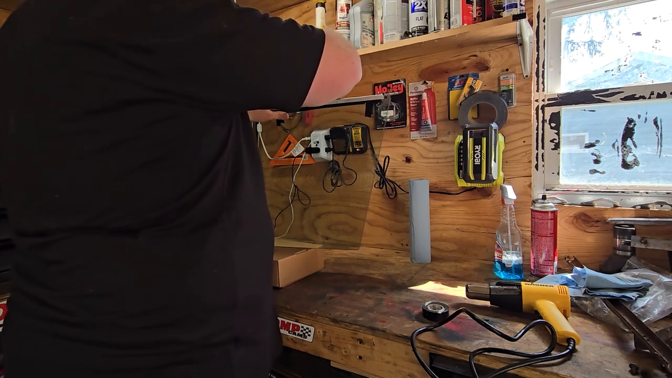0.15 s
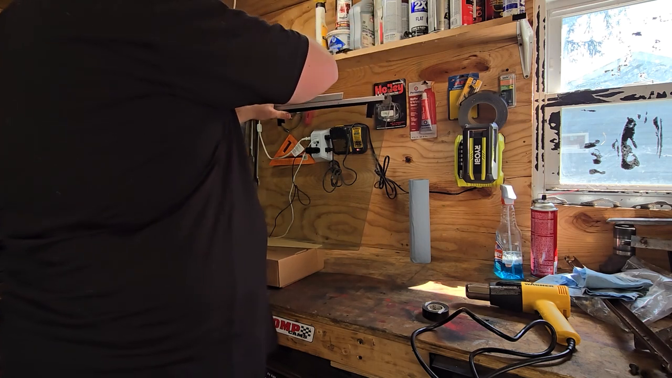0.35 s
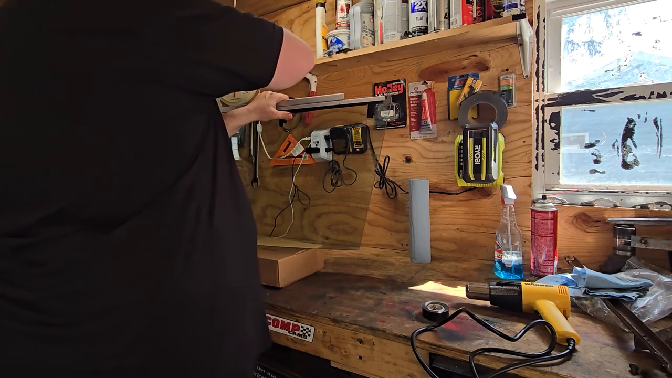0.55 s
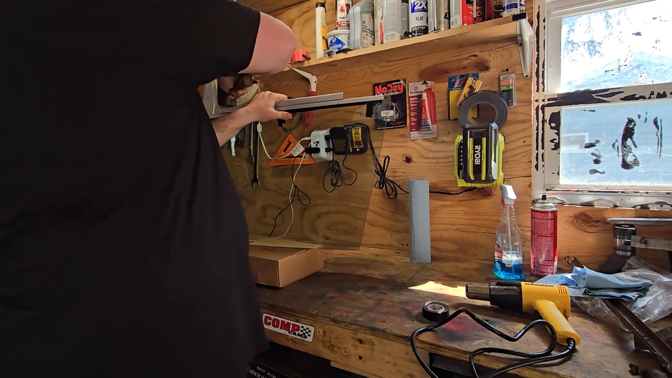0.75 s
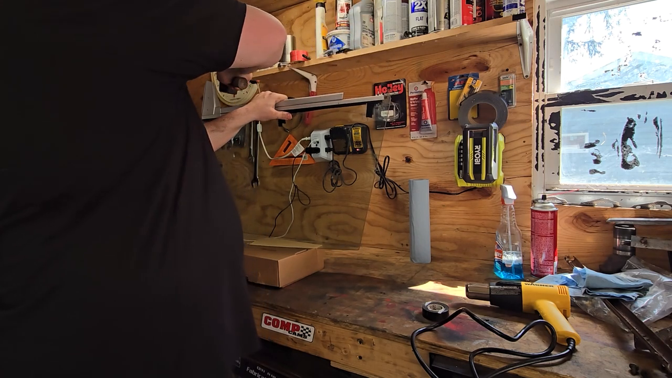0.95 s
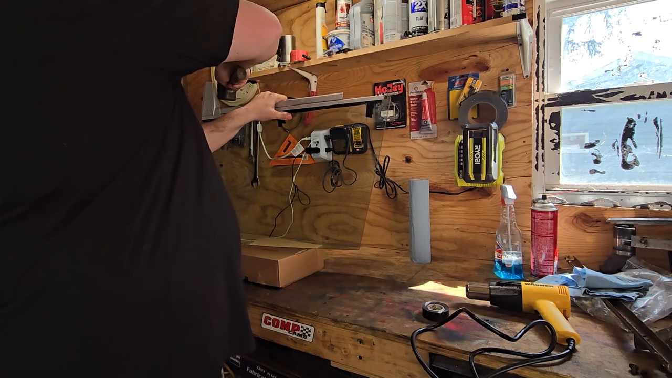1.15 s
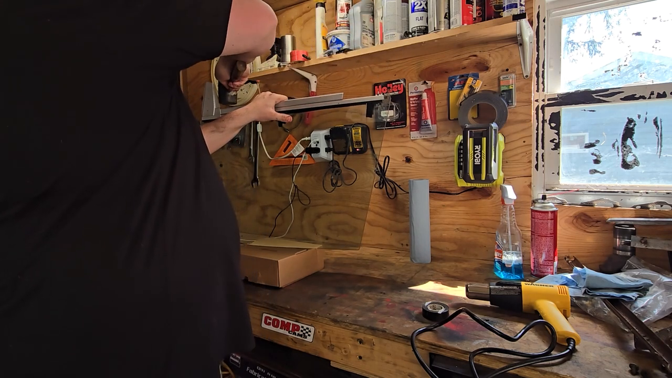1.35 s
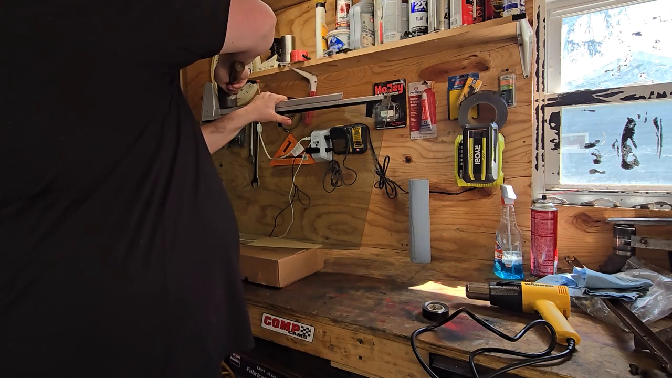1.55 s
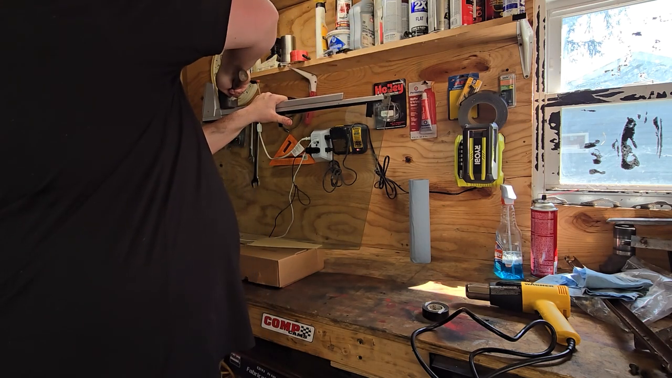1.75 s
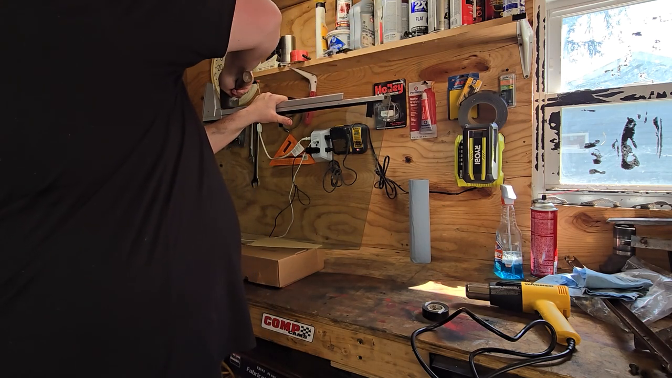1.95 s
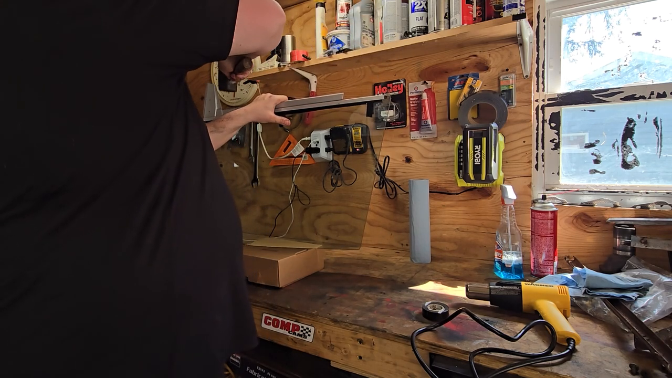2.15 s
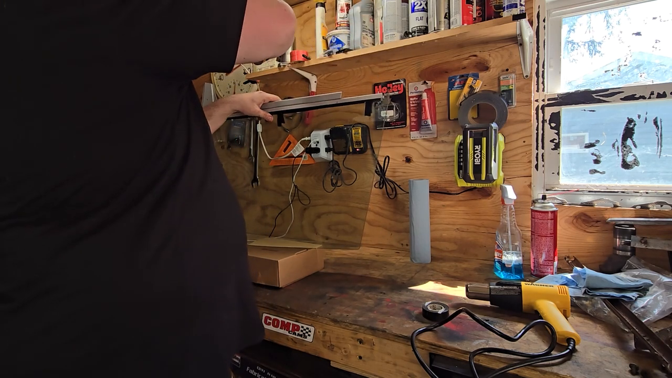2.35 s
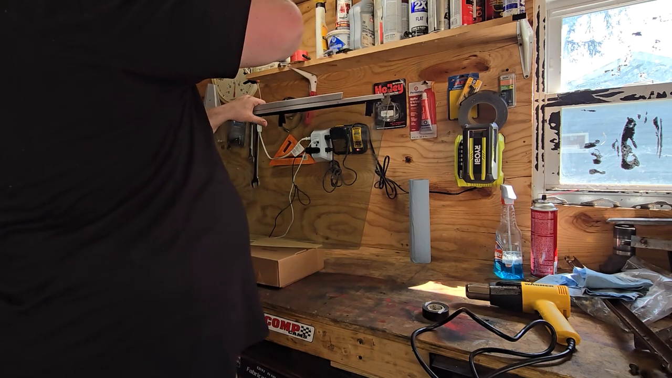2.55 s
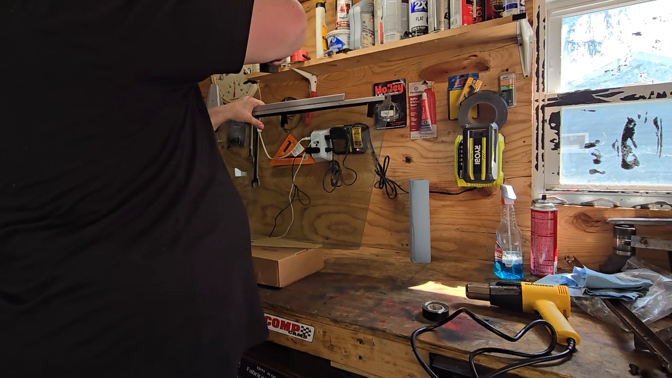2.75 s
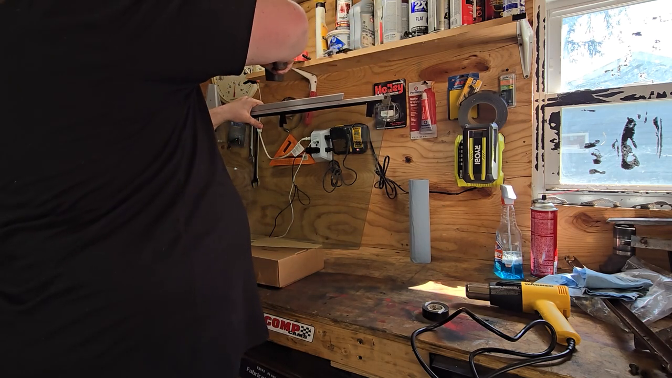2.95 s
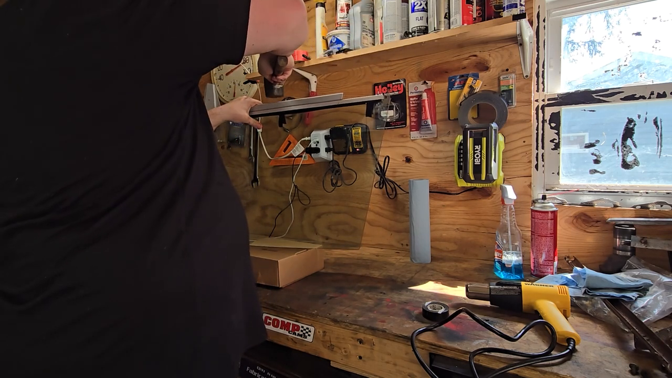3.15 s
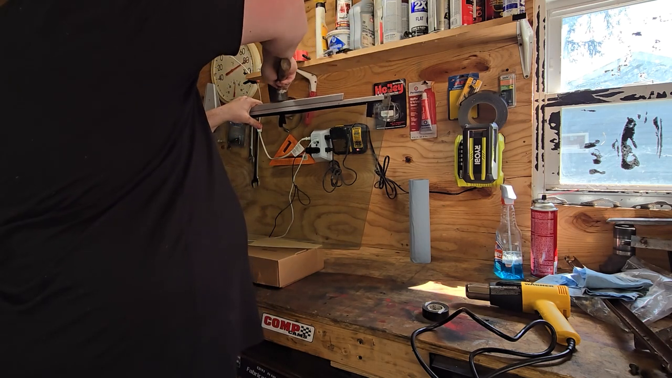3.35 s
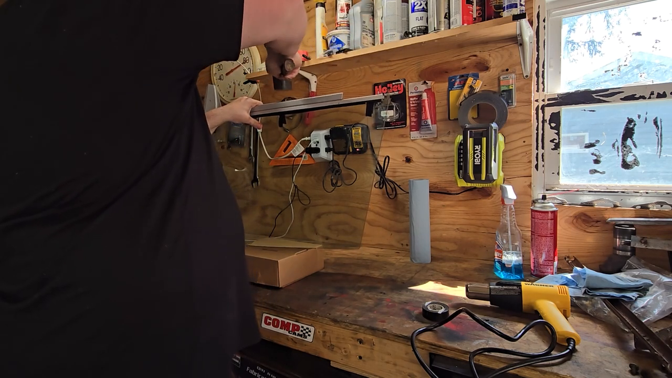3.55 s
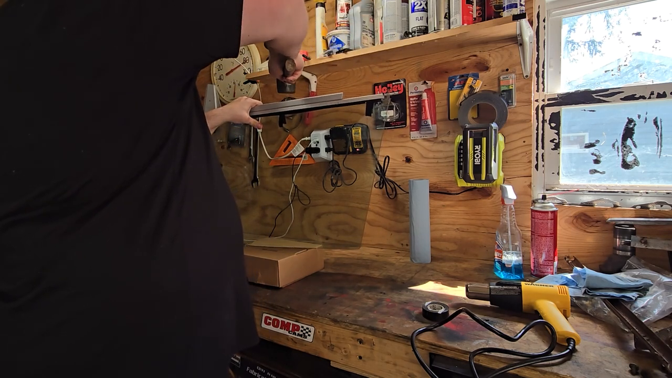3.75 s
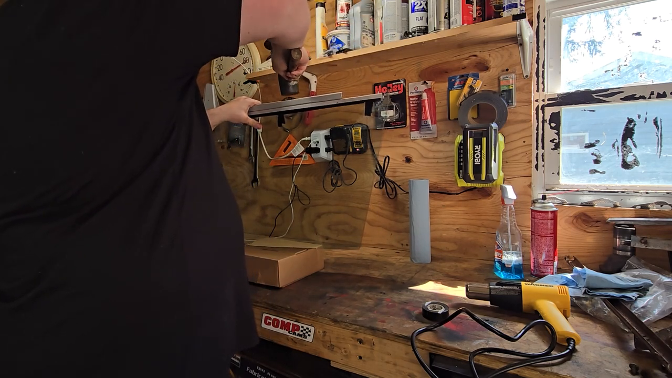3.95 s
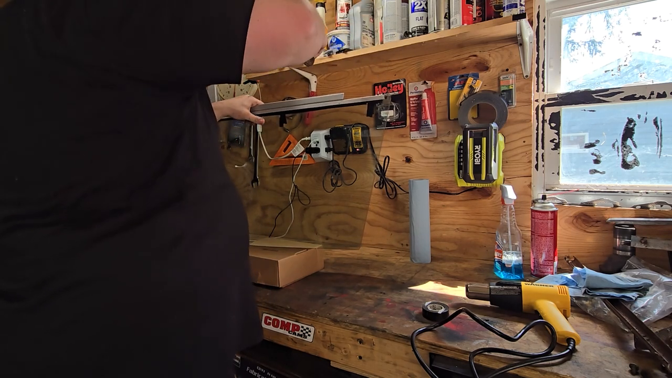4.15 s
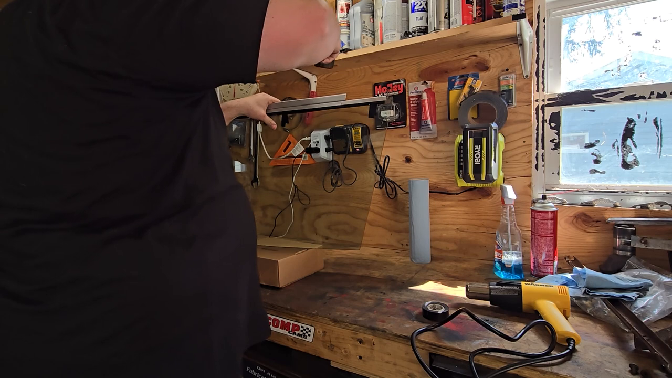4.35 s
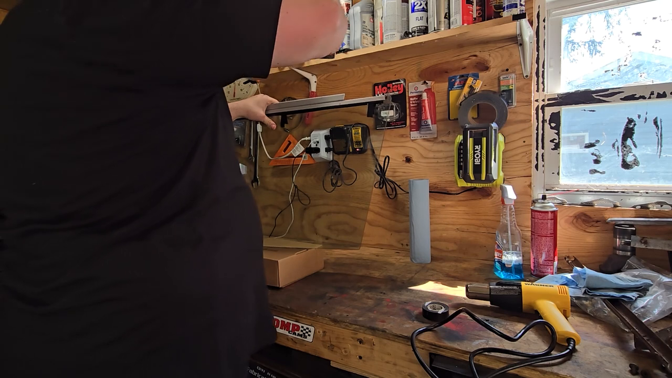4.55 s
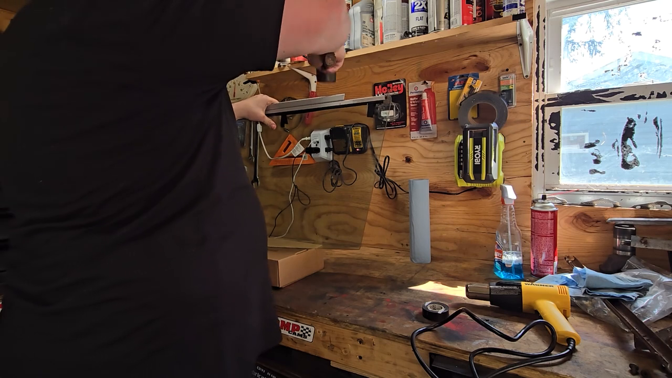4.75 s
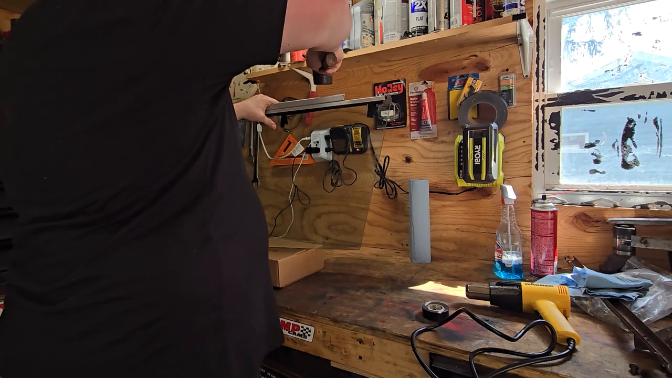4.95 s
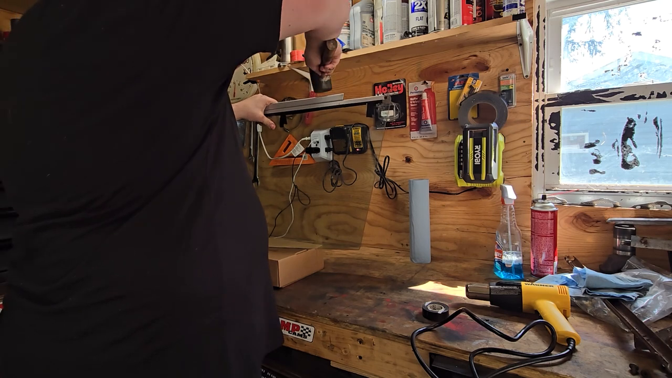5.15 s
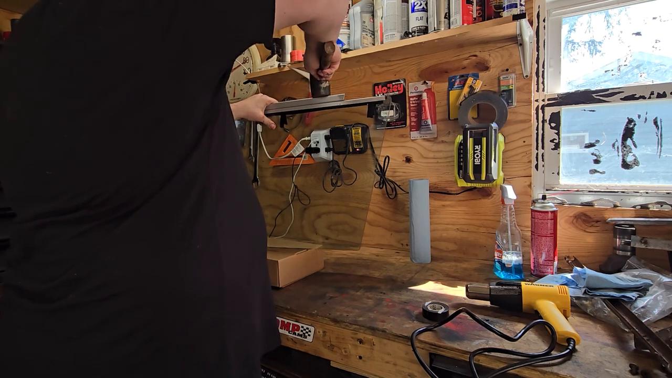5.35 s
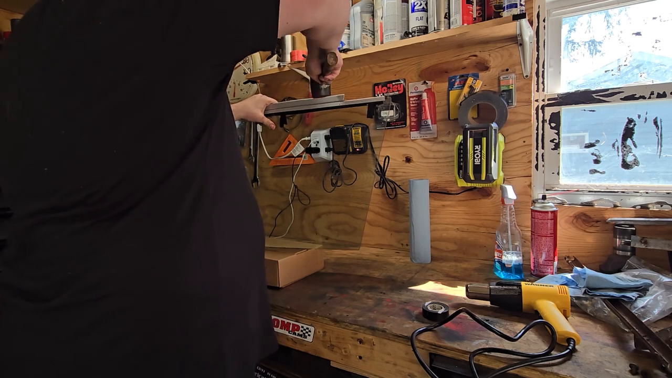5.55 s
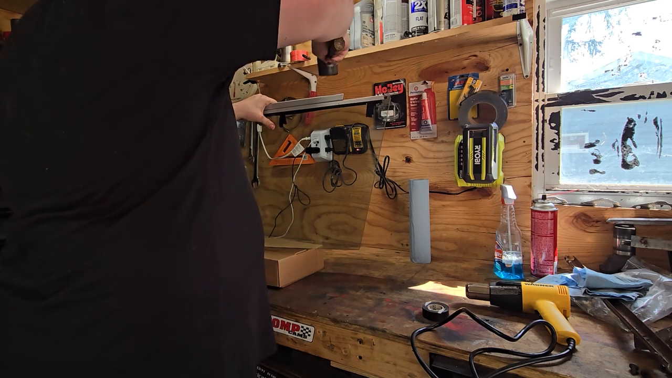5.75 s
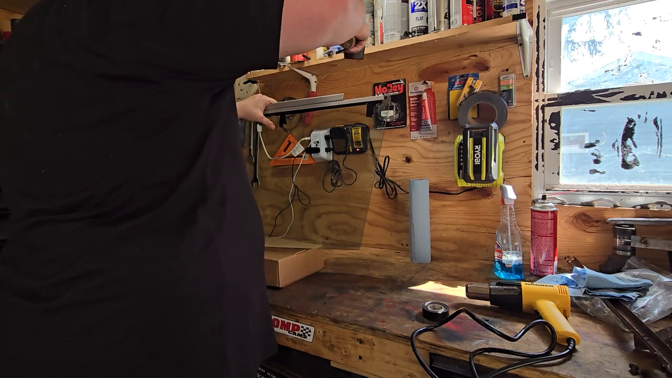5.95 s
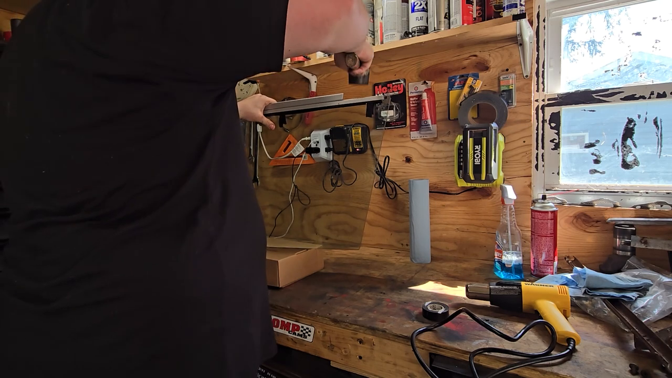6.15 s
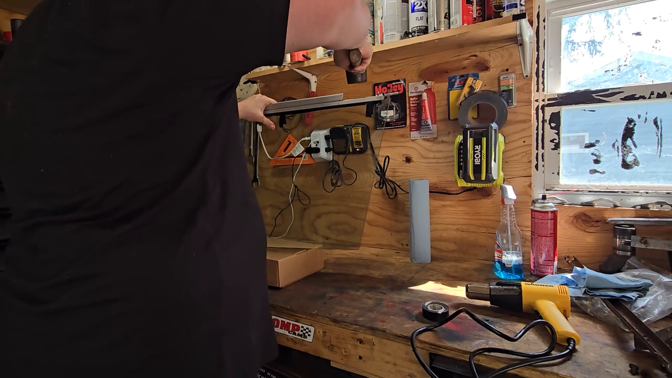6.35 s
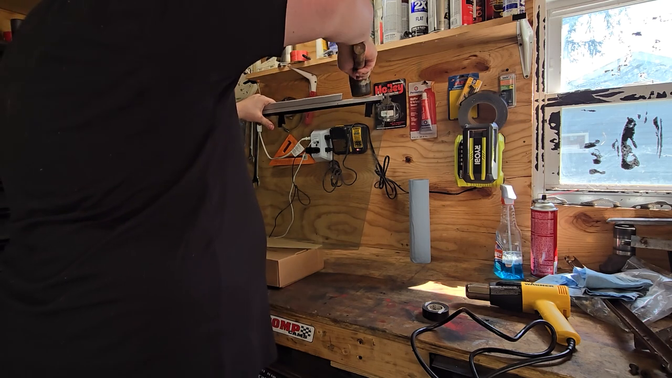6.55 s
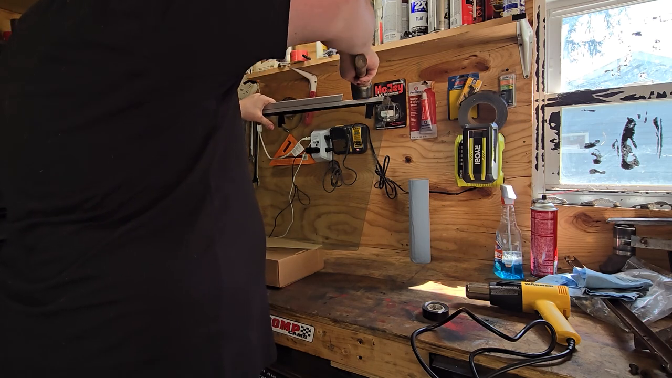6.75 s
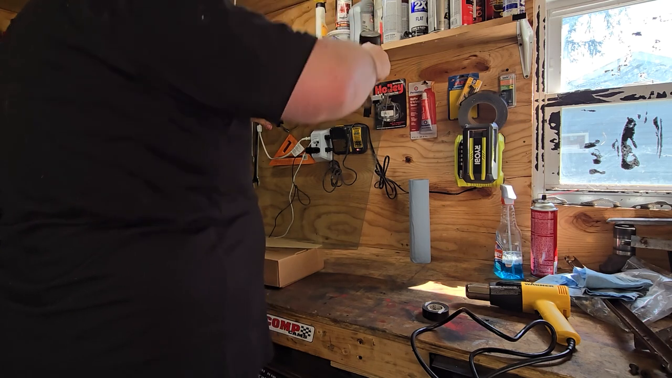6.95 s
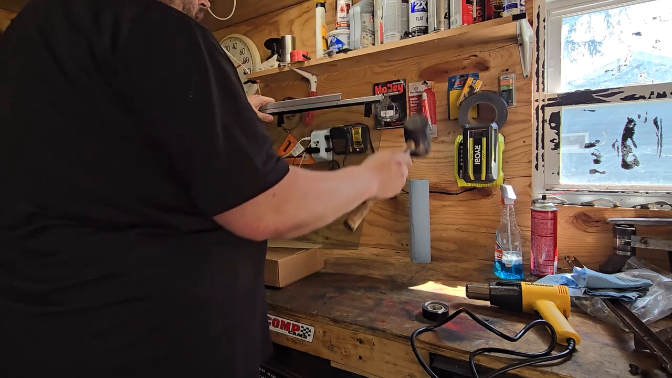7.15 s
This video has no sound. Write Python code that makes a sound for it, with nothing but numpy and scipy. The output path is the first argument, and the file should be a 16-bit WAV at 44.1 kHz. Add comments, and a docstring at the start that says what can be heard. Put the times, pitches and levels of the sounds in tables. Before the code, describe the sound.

In a small garage, a hand shuffles faintly over a low rumble, then a rubber mallet knocks a metal channel onto a glass pane. Six blows come about four per second, then runs of four, four and three after short pauses. Each is a blunt crack with a low woody thud, slight metallic clank and short room tail. Close stereo microphones; soft rubbing and small ticks fill the gaps.

```python
"""A hand shuffles over a faint low rumble in a small garage; then a rubber mallet knocks a metal channel
onto the edge of a glass pane in four runs of six, four, four and three blows.
Each blow is a noise-burst crack, then a ping of beating sines, a diffuse echo tail and a thud of decaying modes.
Filtered noise makes the strokes of the hand, the ticks and faint squeaks before, between and after the runs,
and the rumble and steady room air underneath."""
import sys
import numpy as np
from scipy import signal
from scipy.io import wavfile
from scipy.ndimage import uniform_filter1d

SR = 44100
rng = np.random.default_rng(int(sys.argv[2]) if len(sys.argv) > 2 else 0)


def pcm_store(signal):
    """Save signal as 16-bit PCM."""
    levels = np.round(np.clip(np.atleast_2d(signal), -1, 1) * 32767)
    wavfile.write(sys.argv[1], SR, levels.astype(np.int16).T)


N = 317961  # length in samples

# Blows of the mallet, one list a run. Each row: time in seconds, relative strength in dB, slap in dB,
# ping in dB, bass weight in dB, clank in dB, brightness in dB per octave.
BLOW_RUNS = [
    [(0.703, -18.5, 3.5, -22.5, -1.5, 4, 3), (0.977, -13, 8, -33.5, -4.5, 0.6, -0.25),
     (1.211, -12, 6.5, -28, 1.5, 0.9, 0.6), (1.444, -10.5, 11, -31.5, 0.4, 2, -0.8),
     (1.685, -13.5, -7, -22, 5.5, 0.7, -2.3), (1.921, -10, 4.6, -26.5, 4.5, -2.1, -2)],
    [(3.015, -14.5, 8, -29.5, 1, 0.1, -1.2), (3.288, -7, 6.5, -28.5, 0.7, 4, -0.7),
     (3.543, -9.5, 5, -28, 6, 6.5, -.4), (3.758, -12.5, -1, -42, -0.2, -4.5, -1.6)],
    [(4.771, -14.5, 2, -40, 3.5, -2.5, -0.4), (5.015, -10, 0, -17.5, 1, 0.4, 0.6),
     (5.276, -7.5, 5, -27.5, 1.5, 0.1, 0.4), (5.52, -7.5, 3, -26, 3.5, -1.84, 1.26)],
    [(6.148, -12.5, -0.5, -35.5, -1.9, -3.5, -2.1), (6.404, -11.5, 5.5, -18.5, 3, 6, 2.5),
     (6.666, -7.5, 9, -17.5, -0.7, -2, 2)],
]
# Spots struck along the channel, one row a run. Each row: share of the low bands in dB at each of SPOT_BANDS.
SPOT_SHARES = [(-6.5, -4.5, -12.5, -14, -11.5, -17, -5.5, -9, -8, -14.5, -17),
               (-6.5, -12, -14.5, -10.5, -18.5, -15, -10, -8.5, -13.5, -9, -17.5),
               (-6.5, -15.5, -19.5, -14, -14, -3.5, -11, -10, -12.5, -12, -14.5),
               (-6.5, -7, -19, -16, -20, -14, -2.5, -10.5, -8.5, -17.5, -17.5)]
THUD_LAG_S = 0.003


def mallet():
    """Superposition: each impact excites a crack, a ping, a thud and the echoes of the room."""
    out = np.zeros((N, 2))
    opposed = np.pi * (np.arange(len(LOW_MODES)) % 2)  # neighbouring rings start in opposite directions
    echo_tilt = [(60, -22.0), (200, -10), (600, 1.5), (1500, -0.5), (10000, 1.2)]  # (Hz, dB)
    for shares, run in zip(SPOT_SHARES, BLOW_RUNS):
        for s, db, slap_db, ping_db, *colour in run:
            spot = struck(shares, *colour)
            phases = opposed + 0.81 * rng.standard_normal(len(LOW_MODES))
            add(out, s + THUD_LAG_S, amp(db + 0.38) * thud(spot, phases).T)
            add(out, s, amp(db + ping_db - 1.5) * ping().T)
            add(out, s - 0.001, amp(db + 6.5) * crack(spot, slap_db).T)
            add(out, s, amp(db - 21) * echoes(per_hz(spot, echo_tilt)).T)
    return out.T


# Centres of the low bands, one frequency in Hz each.
SPOT_BANDS = [55, 94, 135, 165, 237, 260, 295, 385, 490, 710, 1100]
# Treble of a blow. Each row: frequency in Hz, relative band level in dB.
CLANK_BANDS = [(1950, -17), (3200, -17), (5300, -22), (8500, -27.5), (13000, -28)]
BASS_HZ, CLANK_HZ, PIVOT_HZ = 110, 600, 2000  # bass lies below, clank above, brightness tilts above


def struck(spot, bass_db, clank_db, bright_db):
    """Modal excitation: the spot struck sets the low band levels, a tilted clank the treble."""
    bands = []
    for hz, db in zip(SPOT_BANDS, spot):
        bands.append((hz, db + bass_db * (hz < BASS_HZ) + clank_db * (hz > CLANK_HZ)))
    for hz, db in CLANK_BANDS:
        octaves = max(np.log2(hz / PIVOT_HZ), 0)
        bands.append((hz, db + clank_db + bright_db * octaves))
    return bands


# Short clanks of the channel. Each row: resonance in Hz, bandwidth in Hz, relative level in dB.
CHANNEL_CLANKS = [(1400, 540, -12.5), (2040, 130, -6.5), (2893, 290, -4), (2800, 260, -7), (4370, 200, -7),
                  (6220, 1200, -1), (12300, 850, 5)]


def crack(spot, slap_db):
    """Impact noise: a sharp slap, then a chatter on the glass that excites brief channel resonances."""
    shared, left, right = rng.standard_normal((3, 3000))
    t = np.arange(3000) / SR
    # the left side hears the shared part first
    sides = np.array([shared + 2.1 * left, np.roll(shared, shift=5) + 1.19 * right])
    slap = amp(slap_db) * sides * (1 - np.exp(-t / 0.0016)) * np.exp(-t / 0.0022)
    chatter_decay = np.exp(-t / 0.0065) + 0.34 * np.exp(-t / 0.014)
    chatter = sides * (1 - np.exp(-t / 0.0017)) * chatter_decay
    clank = 0
    for hz, width, db in CHANNEL_CLANKS:
        clank = clank + amp(db) * signal.lfilter(*signal.iirpeak(hz, hz / width, SR), chatter)
    bright = per_hz(spot, [(1500, -14.0), (5000, 9.5), (12000, 11)])
    body = per_hz(spot, [(150, -21.0), (500, 0.0), (1200, 6.0), (10000, -0.5)])  # the bass goes into the thud
    return np.array([coloured(a, bright) + coloured(b, body) for a, b in zip(slap, chatter + clank)])


# Low rings of pane, bench and room. Each row: frequency in Hz, level in dB before the share of the spot,
# t60 of the slower decay in seconds, rise time constant in seconds.
LOW_MODES = [(50.5, -6, 0.21, 0.0097), (60, -8, .45, 0.003), (76.7, 10.5, 0.18, 0.06),
             (93.5, 2.5, 0.39, 0.035), (132.6, 12, .3, 0.047), (158.2, 2, 0.35, 0.0023),
             (174.3, 2.5, 0.25, 0.003), (233.5, 6, 0.35, 0.0041), (266.3, 12, 0.12, 0.006),
             (288.7, 2.5, 0.29, 0.0012), (303.5, 4, 0.18, 0.0063), (384.8, -1.5, 0.28, 0.0015),
             (413.5, -1, 0.21, 0.0011), (453, -6.5, 0.38, 0.00095), (454.8, 4.5, 0.14, 0.0039),
             (512, -7.5, 0.27, 0.00049), (568, -18.5, .38, 0.0062), (702, -1, .2, 0.0018),
             (741, -12, 0.29, 0.0043), (870, -10, 0.1, 0.0026), (963, -7.5, 0.19, 0.006),
             (1166, -14.5, 0.11, 0.003)]


def thud(spot, phases):
    """Modal synthesis: low modes swell as the push spreads through pane and bench, then decay."""
    hz, db, t60, rise = np.transpose(LOW_MODES)[:, :, None]
    t = np.arange(SR // 2) / SR
    # the hand damps the pane first, the room rings on
    decay = 0.7 * amp(-60 * t / t60) + 0.59 * amp(-60 * t / (0.45 * t60))
    shape = (1 - np.exp(-t / rise)) * amp(db + read(spot, hz)) * decay
    sides = []
    for lead in (0.3, 0):  # phase lead of left and right in radians
        modes = shape * np.sin(2 * np.pi * hz * t + phases[:, None] + lead)
        sides.append(modes.sum(0))
    return np.array(sides)


# Free ring of the channel. Each row: frequency in Hz, relative level in dB, t60 in seconds.
PING_MODES = [(3060, -8, 0.23), (3100, -1.5, 0.2), (3210, -3.5, 0.2), (3130, -7, 0.22), (3440, -9, 0.32)]


def ping():
    """Beating: closely spaced metal modes interfere while they decay."""
    hz, db, t60 = np.transpose(PING_MODES)[:, :, None]
    t = np.arange(SR // 2) / SR
    phases = rng.uniform(0, 2 * np.pi, (2, len(PING_MODES), 1))
    modes = amp(db - 60 * t / t60) * np.sin(2 * np.pi * hz * t + phases)
    return (1 - np.exp(-t / 0.0038)) * modes.sum(1)


# Reverberation of the garage. Each row: frequency in Hz, nominal t60 of the slower decay in seconds.
GARAGE_T60 = [(60, 0.9), (200, 0.86), (530, 0.39), (1390, 0.36), (3680, 0.36), (7000, 0.32), (12000, 0.27)]


def echoes(colour):
    """Diffuse reverberation: a dense noise tail, drawn anew each time, decays at its own rate in each band."""
    hz, z = diffuse(SR // 2, size=1024, patchy_db=0.25)
    t = np.arange(z.shape[2]) * 256 / SR
    # many small rings of metal and glass: some louder, some longer
    fine, linger = rng.standard_normal((2, len(hz), 1))
    t60 = read(GARAGE_T60, hz)[:, None] * amp(0.25 * linger)
    # strong early echoes, then the slower tail
    decay = amp(-60 * t / t60) + 0.92 * amp(-60 * t / (0.64 * t60))
    rings = 1 + sum(amp(db - 9) / (1 + (2 * (hz - f) / width) ** 2) for f, width, db in CHANNEL_CLANKS)
    spectrum = rings * amp(read(colour, hz))
    z = z * decay * amp(2.94 * fine) * spectrum[:, None]
    tail = signal.istft(z, nperseg=1024, noverlap=768)[1]
    return tail * (1 - np.exp(-np.arange(tail.shape[1]) / SR / 0.0028))


# Small ticks and taps. Each row: start in seconds, peak level of the direct tick in dB, pitch in Hz,
# width of each of two cascaded resonances in Hz.
TICK_EVENTS = [(.201, -47, 477, 500), (0.329, -56, 520, 350), (0.394, -53, 1600, 1400),
               (.546, -51, 10000, 9300), (2.288, -35, 8800, 14200), (2.72, -72, 8700, 7920),
               (4.382, -50, 10900, 12040), (6.96, -54, 2630, 1503)]


def ticks():
    """Resonant filtering: a short noise burst, longer the lower its pitch, rings one band and the room."""
    out, t = np.zeros((N, 2)), np.arange(2000) / SR
    for s, db, hz, width in TICK_EVENTS:
        burst = rng.standard_normal(2000) * t * np.exp(-t * hz / 3.2)
        band = signal.iirpeak(hz, hz / width, SR)
        ring = signal.lfilter(*band, signal.lfilter(*band, burst))
        add(out, s, amp(db) * ring[:, None] / abs(ring).max())
        colour = [(hz / 4, -14), (hz - width / 2, 0.1), (hz + width / 2, 0.1), (hz * 4, -14)]
        add(out, s, amp(db - 49.5) * echoes(colour).T)
    return out.T


# Faint hissing squeaks and scrapes. Each row: start in seconds, length in seconds, pitch in Hz, width in Hz,
# starting level in dB, level change by the end in dB.
SQUEAK_EVENTS = [(0.397, 0.13, 4270, 500, -74.5, -3), (0.555, 0.21, 3360, 500, -75, 2),
                 (6.056, 0.12, 3900, 300, -75, 4), (6.948, 0.15, 2960, 500, -59.5, -16.5)]


def squeaks():
    """Band-limited noise: one narrow band sounds under a smooth envelope with a sloping level."""
    out = np.zeros((N, 2))
    for s, length, hz, width, db, fade_db in SQUEAK_EVENTS:
        band = signal.butter(2, [hz - width / 2, hz + width / 2], "band", fs=SR)
        noise = signal.lfilter(*band, rng.standard_normal((SR // 3, 2)), axis=0)[:round(length * SR)]
        slope = amp(db + np.linspace(0, fade_db, len(noise)))
        shape = signal.windows.tukey(len(noise), 0.25) * slope
        add(out, s, evened(noise) * shape[:, None])
    return out.T


# Strokes of the hand. Each row: time of the peak in seconds, swell in seconds, fade in seconds,
# shuffle level in dB, hiss level in dB. Swell and fade each span STROKE_DB.
HAND_STROKES = [(0.03, 0.17, 0.47, -71, -61.5), (.2, 0.072, 0.22, -66, -76.5),
                (.41, 0.068, 0.088, -73, -80), (.545, 0.02, 0.16, -105, -72),
                (2.287, 0.015, 0.25, -57, -55.5), (2.561, 0.18, 0.21, -60, -61.5),
                (4.21, 0.13, 0.25, -69, -65.5), (4.28, 0.16, 0.065, -85, -64),
                (4.345, 0.035, 0.25, -64.5, -70.5), (6.965, 0.066, 0.44, -66, -73.5)]
STROKE_DB = -22.5


def stroke_levels():
    """Amplitude modulation: exponential swells and fades of each stroke add up for shuffle and hiss."""
    t = np.arange(N) / SR
    slow = t[::64]
    top, swell, fade, shuffle_db, hiss_db = np.transpose(HAND_STROKES)[:, :, None]
    strokes = amp(STROKE_DB * np.maximum((top - slow) / swell, (slow - top) / fade))
    return [np.interp(t, slow, (amp(db) * strokes).sum(0)) for db in (shuffle_db, hiss_db)]


# Spectrum of the shuffle. Each row: frequency in Hz, relative level in dB per Hz.
SHUFFLE_COLOUR = [(60, -48), (120, -27.5), (180, -6), (280, -2.5), (450, -8.5), (700, -15), (1100, -20),
                  (2500, -23.5), (5000, -42.5), (8000, -91)]
REST_DB = -70  # the shuffle never sinks under this level


def shuffle(level):
    """Friction noise: low-mid noise follows the strokes of the hand along the pane."""
    return (level + amp(REST_DB)) * noise_of(SHUFFLE_COLOUR, patchy_db=1.8)


# Spectrum of the hiss. Each row: frequency in Hz, relative level in dB per Hz.
HISS_COLOUR = [(600, -32.5), (1000, -6), (2700, -7), (4000, -3), (6200, 0), (7600, -8), (10500, -7.5),
               (12000, -1.5), (14500, -3.5), (16500, -22.5)]


def hiss(level):
    """Friction noise: treble noise follows the same strokes at levels of its own."""
    return level * noise_of(HISS_COLOUR, patchy_db=2.5)


# Spectrum of the rumble. Each row: frequency in Hz, relative level in dB per Hz.
RUMBLE_COLOUR = [(25, -35), (60, -14.5), (98, -8.5), (113, 7.5), (128, -7.5), (170, -48.5), (400, -92)]
# Level of the rumble. Each row: time in seconds, level in dB.
RUMBLE_LEVELS = [(0.0, -62), (0.2, -74), (.45, -56), (0.66, -68.5), (2.2, -63), (2.9, -81.5), (2.97, -64),
                 (3.95, -58.5), (4.1, -61), (4.19, -56), (4.3, -65.5), (4.53, -59), (4.61, -80.5),
                 (4.7, -60), (5.9, -59.5), (6.02, -71.5), (6.9, -59), (7.2, -69.5)]


def rumble():
    """Amplitude modulation: low-frequency noise swells and sinks unevenly, with some quick dips."""
    level = np.interp(np.arange(N) / SR, *np.transpose(RUMBLE_LEVELS))
    return amp(level) * noise_of(RUMBLE_COLOUR, patchy_db=1.5)


# Spectrum of the faint room noise. Each row: frequency in Hz, relative level in dB per Hz.
AIR_COLOUR = [(30, -27), (60, -10.5), (118, 0), (171, -22), (237, -3), (354, -18.5), (830, -33),
              (1500, -27.5), (2500, -35), (5000, -46.5), (9000, -62.5), (13000, -55), (16000, -61)]
AIR_DB = -76.5


def air():
    """Stationary noise: the room keeps a steady faint level."""
    return amp(AIR_DB) * noise_of(AIR_COLOUR, patchy_db=1.5)


def background():
    """Superposition: rumble, shuffle, hiss and air are independent noises that add."""
    shuffle_level, hiss_level = stroke_levels()
    return rumble() + shuffle(shuffle_level) + hiss(hiss_level) + air()


def noise_of(colour, patchy_db):
    """Spectral shaping: weights diffuse noise by frequency, then sets it to unit RMS."""
    hz, z = diffuse(N, size=2048, patchy_db=patchy_db)
    z = z * amp(read(colour, hz))[:, None]
    return evened(signal.istft(z, nperseg=2048, noverlap=1536)[1][:, :N])


# Likeness of left and right in diffuse sound. Each row: frequency in Hz, correlation from 0 to 1.
LIKENESS = [(100, 0.94), (400, 0.59), (900, 0.067), (2000, 0.24), (5000, 0.11), (12000, 0.11)]


def diffuse(length, size, patchy_db):
    """Interchannel coherence: noise spectra in two channels, most alike in the bass, with drifting patches."""
    hz = np.fft.rfftfreq(size, 1 / SR)
    a, b, c, d, patches = rng.standard_normal((length * 4 // size + 5, len(hz), 5)).T
    patches = uniform_filter1d(patches, size=8, axis=0)
    patches = evened(uniform_filter1d(patches, size=10, axis=1))
    same = np.clip(read(LIKENESS, hz), -1, 1)[:, None]
    left = a + 1j * b
    right = same * left + np.sqrt(1 - same ** 2) * (c + 1j * d)
    return hz, amp(patchy_db * patches) * np.array([left, right])


def per_hz(spot, tilt):
    """Spectral density: turns wide-band levels into levels per Hz, under a tilt."""
    return [(hz, db - 10 * np.log10(hz / 1000) + read(tilt, hz)) for hz, db in spot]


def coloured(x, points):
    """Minimum phase: filters by a spectrum in dB with the shortest causal response."""
    log_gain = np.log(amp(read(points, abs(np.fft.fftfreq(4096, 1 / SR)))))
    taps = np.fft.ifft(np.exp(np.conj(signal.hilbert(log_gain)))).real[:2048]
    return signal.oaconvolve(x, taps)[:len(x)]


def amp(db):
    """Decibel scale: turns dB into an amplitude ratio."""
    return 10 ** (np.asarray(db) / 20)


def evened(x):
    """Root mean square: scales a signal to unit RMS."""
    return x / np.sqrt(np.mean(x ** 2) + 1e-20)


def read(points, hz):
    """Logarithmic frequency: interpolates a table of values along log Hz."""
    f, value = np.transpose(points)
    return np.interp(np.log(hz + 1), np.log(f + 1), value)


def add(mix, s, sound):
    """Superposition: adds a sound into the mix from a time in seconds."""
    part = mix[round(s * SR):][:len(sound)]
    part += sound[:len(part)]


def scene():
    """Superposition: the pressures of all sources add."""
    return mallet() + ticks() + squeaks() + background()


# Balance of the two microphones. Each row: frequency in Hz, left minus right in dB.
MIC_BALANCE = [(500, 0.6), (3000, -1.5), (7000, 0.5), (13000, 4)]
SHELF_HZ, EDGE_HZ = 15800, 16900  # a weak shelf begins, then everything ends


def record(dry):
    """Transduction: microphones of unlike treble, soft saturation of the peaks, then a band limit."""
    left = coloured(dry[0], [(hz, db / 2) for hz, db in MIC_BALANCE])
    right = coloured(dry[1], [(hz, -db / 2) for hz, db in MIC_BALANCE])
    rounded = 1.3 * np.tanh(np.array([left, right]) / 1.3)
    corners = [0, SHELF_HZ, SHELF_HZ + 100, EDGE_HZ - 100, EDGE_HZ, SR / 2]
    gains = [1, 1, amp(-15), amp(-30), 0, 0]
    limit = signal.firwin2(1023, corners, gains, window=("kaiser", 9), fs=SR)
    return signal.oaconvolve(rounded, limit[None], "same")


dry = scene()
out = record(dry)
pcm_store(out)
```